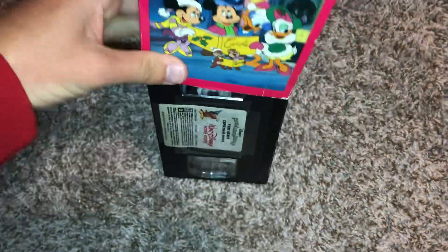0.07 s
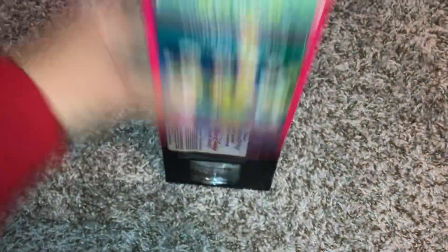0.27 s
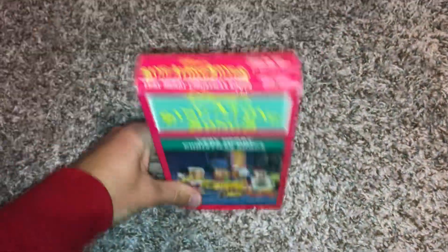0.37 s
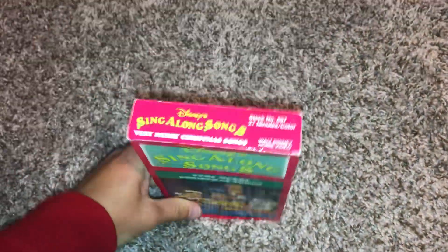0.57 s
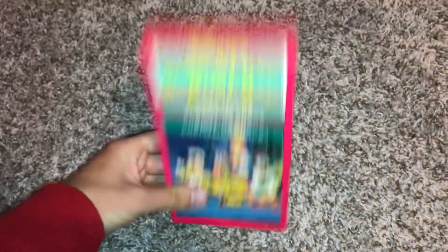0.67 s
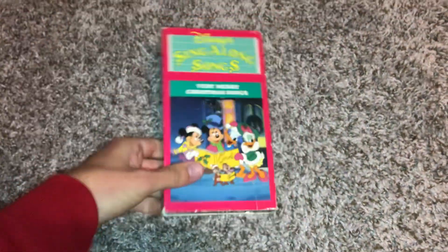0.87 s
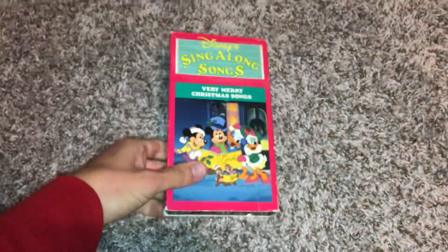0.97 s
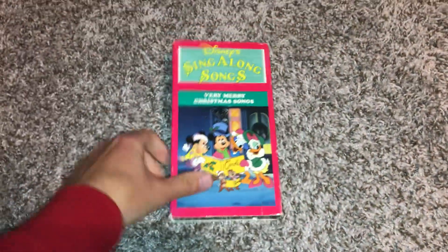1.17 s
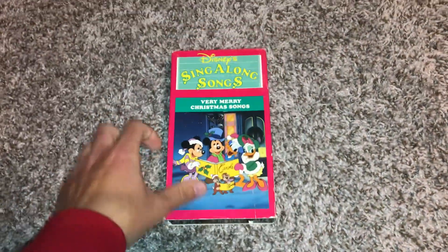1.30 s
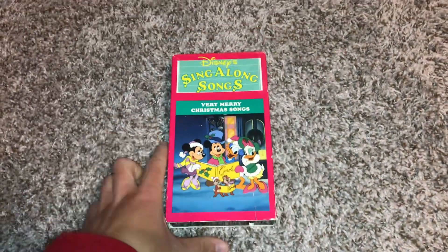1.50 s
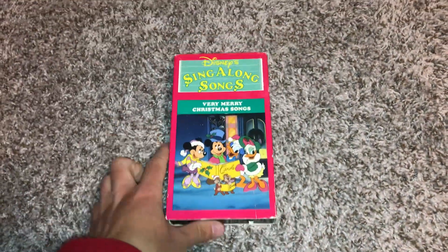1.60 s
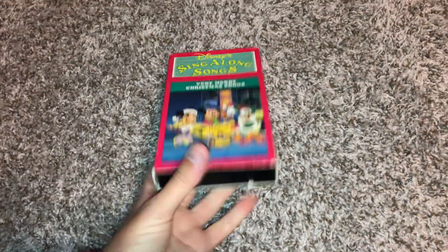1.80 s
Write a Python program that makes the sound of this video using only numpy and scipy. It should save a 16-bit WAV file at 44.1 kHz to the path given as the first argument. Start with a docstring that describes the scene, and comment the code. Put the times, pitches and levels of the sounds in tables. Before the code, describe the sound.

A cardboard sleeve scrapes onto a video cassette, clacks home, then knocks down onto carpet.

```python
"""In a small room with a steady mains hum, a cardboard sleeve is pushed down over a video cassette.
Its edges tick on the plastic, it scrapes, and it sticks and slips in a short rising squeak before the
cassette seats with a clack. The box is tipped over and laid on carpet with its loose reels rattling.
Fingers brush it and pick it up again. Each knock is a burst of noise plus a few ringing tones, each
scrape is a stream of tiny slips, and the room answers with a short echo."""
import sys
import numpy as np
from scipy import signal
from scipy.fft import rfft, irfft, next_fast_len
from scipy.io import wavfile

SR = 44100
rng = np.random.default_rng(int(sys.argv[2]) if len(sys.argv) > 2 else 0)


def store_pcm(level_fs):
    """Save levels as 16-bit WAV."""
    pcm = np.round(np.clip(level_fs, -1, 1) * 32767).astype(np.int16)
    wavfile.write(sys.argv[1], SR, np.atleast_2d(pcm).T)


N = 81585

# Four kinds of hit. Each row: start in seconds, level in dB, then bass and treble in dB from that level.
EDGE_CATCHES = [(.0298, -48.5, -27, -5), (.0432, -41.5, -17.5, -13), (.0713, -47, -4, -21.5),
                (.0755, -39.5, -4, -24.5), (.0995, -42, -9.5, -20), (.1178, -35, -7.5, -13.5),
                (.1220, -43.5, 6, -14.5), (.1865, -37, -7, -10), (.1885, -30, -4, -26.5),
                (.2130, -37, 2, -25), (.2210, -37.5, -4, 1.5), (.2935, -37.5, -16.5, -18)]  # cardboard edges catch on the plastic
SEATING_CLACKS = [(.3092, -19, -5.5, -0.5), (.3145, -25.5, -8.5, -6), (.3178, -17.5, -7.5, -5.5),
                  (.3228, -17, -12, -9.5)]  # the cassette seats in the sleeve
FINGER_TICKS = [(.5195, -47.5, -22, -15), (.5360, -53.5, 1, -0.5), (.6535, -52.5, -4, -2.5),
                (1.167, -51, -0.5, -11), (1.2017, -52.5, 2, -8), (1.2166, -43, -5, -9),
                (1.230, -50.5, 4, -15), (1.2415, -43, -4.5, -8.5), (1.8393, -45.5, 1, -6),
                (1.8475, -40.5, 6, -6.5)]  # fingers and nails tap the box
TIPPING_KNOCKS = [(.7252, -30.5, -7.5, -25), (.7285, -27, -45, -17.5), (.7320, -41.5, -33, -14),
                  (.7932, -30.5, -1.5, -0.5), (.7963, -35.5, -4, -1), (.8040, -45.5, 7.5, -1),
                  (.8205, -35.5, -10.5, -5), (.8305, -42, 4.5, -10.5), (.8835, -45, -5, -20)]  # shell and reels knock as the box tips and lands
# The tones a part rings with when hit. Each row: pitch in Hz, relative level in dB.
SLEEVE_TONES = [(700, -2.5), (930, -4.5), (1055, -2), (1560, -5.5)]
SHELL_TONES = [(562, -1.5), (675, -9), (1085, 6), (1687, 6), (1846, -6.5), (2213, -3), (2463, -1),
               (2966, -1.5), (3177, 3.5), (6875, -3.5)]
REEL_TONES = [(790, 3.5), (1290, -1), (1762, 4), (2467, 3), (2671, 1), (3850, 4)]
# The sharp tip of a hit. Each gives: pitch in Hz, seconds to fade by 60 dB, relative level in dB.
BARE_CLICK = (8800, 0.0011, 15)
REEL_PING = (8170, .016, 1)
# Hollow booms as the cassette seats and the box lands.
# Each row: start in seconds, pitch in Hz, level in dB, seconds to fade by 60 dB.
BOX_BOOMS = [(0.3216, 314.6, -14, 0.068), (0.796, 75.6, -32.5, 0.1), (0.817, 52.6, -24, 0.067)]

# How the longer noises swell and fade. Each row: time in seconds, level in dB.
RUMBLE_LEVELS = [(0, -58), (.17, -48), (.22, -41.5), (.28, -34.5), (.34, -42.5), (.39, -52.5), (.6, -74)]  # the box moves in the hand
SCRAPE_LEVELS = [(.195, -84), (.212, -53), (.226, -34.5), (.245, -35), (.272, -31), (.29, -30),
                 (.308, -31.5), (.328, -29.5), (.345, -65)]  # the sleeve is pushed on
BRUSH_LEVELS = [(.56, -69.5), (.587, -50), (.602, -53.5), (.632, -46.5), (.655, -47), (.70, -102),
                (1.12, -80), (1.163, -53.5), (1.183, -58.5), (1.212, -51.5), (1.258, -63), (1.278, -56),
                (1.31, -100.5)]  # skin and carpet brush the box
GRIP_LEVELS = [(1.48, -85.5), (1.66, -68.5), (1.84, -73.5)]  # fingertips slide round the box to grip it
# The path of the sleeve's squeak. Each row: time in seconds, pitch in Hz, level in dB.
SQUEAK_PATH = [(.243, 740, -34.5), (.249, 820, -27), (.258, 962, -25), (.266, 996, -22), (.273, 1050, -24),
               (.281, 1150, -25.5), (.286, 1180, -29), (.294, 1210, -31.5), (.301, 1233, -59.5)]
# The tones within the squeak. Each row: multiple of the pitch, relative level in dB.
SQUEAK_HARMONICS = [(1, 4), (2, -17), (3, -18)]

# A colour says how strong the lows and highs are. Each row: frequency in Hz, relative level in dB.
AIR_COLOUR = [(45, -19), (90, -19), (200, -21), (600, -26), (1300, -33), (1750, -30), (2150, -35),
              (4600, -38), (8000, -53), (15500, -54.5), (17000, -78.5)]  # moving air in the room
RUMBLE_COLOUR = [(45, -2), (90, 4), (180, -4), (350, -4.5), (1500, -53.5)]  # the handled box
THUMP_COLOUR = [(60, -17.5), (190, -4), (320, -1.5), (570, -1.5), (850, -12.5), (2000, -39)]  # the dull part of a hit
CARDBOARD_COLOUR = [(300, -40), (900, 5.5), (1700, -4), (2700, -10), (4500, -14.5), (16000, -50.5)]  # the crack of cardboard
PLASTIC_COLOUR = [(380, -31.5), (760, 2.5), (1800, 0), (3600, 3), (5000, -6), (8000, -15), (16000, -45)]  # the crack of plastic
BRIGHT_COLOUR = [(2000, -31.5), (4500, -10), (6400, 2.5), (8000, -10), (11000, -7.5), (16000, -17.5)]  # the snap of a hit, and sliding fingertips
SCRAPE_COLOUR = [(60, -21), (200, -3), (500, 4.5), (1200, 6), (2300, 2), (4000, -1.5), (6500, -4),
                 (10000, -6.5), (16000, -14)]  # cardboard sliding on plastic
BRUSH_COLOUR = [(100, 12), (280, 15), (900, 4), (3000, 6.5), (6000, -0.5), (9000, -5), (16000, -12.5)]  # skin and carpet on cardboard
ECHO_COLOUR = [(300, -4), (550, 5.5), (900, 1.5), (1500, 0.5), (16000, -1)]  # the room's answer

# The faint whine of an appliance. Each row: pitch in Hz, level in dB.
APPLIANCE_TONES = [(1520, -72), (1865, -69), (3192, -73.5), (4500, -75.5)]
# How long the room's echo lasts. Each row: frequency in Hz, seconds to fade by 60 dB.
ECHO_FADES = [(250, 0.29), (700, 0.32), (3000, 0.32), (14000, 0.27)]

HUM_HZ, HUM_DB, AIR_DB = 120, -45, -55.5
LOW_CUT_HZ, TOP_HZ = 30, 16600


def amp(db):
    """Turn decibels into a number to multiply by."""
    return 10 ** (np.asarray(db) / 20)


def unit(x):
    """Scale a sound so that its average power is 1."""
    return x / np.sqrt(np.mean(x ** 2) + 1e-20)


def along(points, hz):
    """Read a table between its frequencies, giving each octave about equal space."""
    freqs, values = np.transpose(points)
    return np.interp(np.log(hz + 1), np.log(freqs + 1), values)


def curves(rows):
    """Join timed rows with straight lines: one curve for each column after the time."""
    times, *columns = np.transpose(rows)
    return [np.interp(np.arange(N) / SR, times, column) for column in columns]


def gate(rows):
    """On between a table's first and last time, off outside them."""
    t = np.arange(N) / SR
    return (t >= rows[0][0]) & (t <= rows[-1][0])


def wobble(rate):
    """A curve that glides to a new random value rate times a second."""
    return np.interp(np.arange(N) * rate / SR, np.arange(N), rng.standard_normal(N))


def coloured(x, colour):
    """Shape a sound's lows and highs, then set its average power to 1."""
    gains = amp(along(colour, np.fft.rfftfreq(len(x), 1 / SR)))
    return unit(irfft(rfft(x) * gains, len(x)))


def fade(t, t60):
    """Die away by 60 dB every t60 seconds."""
    return np.exp(-np.log(1000) * t / t60)


def add(track, start, sound):
    """Mix a sound into the track at a start time in seconds."""
    part = track[int(start * SR):][:len(sound)]
    part += sound[:len(part)]


def background():
    """The mains hums, an appliance whines with a fuzzy pitch, and air moves."""
    t = np.arange(N) / SR
    hum = unit(np.sin(2 * np.pi * HUM_HZ * t)) * amp(HUM_DB + 0.33 * wobble(6))
    whine = sum(unit(np.sin(2 * np.pi * hz * t + 2 * wobble(80))) * amp(db)
                for hz, db in APPLIANCE_TONES)
    air = amp(AIR_DB) * coloured(rng.standard_normal(N), AIR_COLOUR)
    return hum + whine + air


def rumble_and_booms():
    """The hollow box rumbles in the hand and booms at the heavy hits."""
    rumble = coloured(rng.standard_normal(N), RUMBLE_COLOUR)
    out = rumble * amp(curves(RUMBLE_LEVELS)[0]) * gate(RUMBLE_LEVELS)
    t = np.arange(SR // 2) / SR
    for start, hz, db, t60 in BOX_BOOMS:
        rise = 1 - np.exp(-t * hz * 2)
        add(out, start, -amp(db) * np.sin(2 * np.pi * hz * t) * fade(t, t60) * rise)
    return out


def hits(rows, colour, tones, tip, crack_t60, ring_t60, ring_db, snap_ratio):
    """Each hit makes a dull thump, a crack and a bright snap with a sharp tip, and sets a part ringing."""
    out, t = np.zeros(N), np.arange(8192) / SR

    def struck(sound, t60):
        """Give a sound a fast rise, a fade and the energy of 5 ms at power 1."""
        sound = sound * fade(t, t60) * (1 - np.exp(-t / .0004))
        return sound / np.sqrt(np.sum(sound ** 2) / (.005 * SR))

    def burst(noise_colour, t60):
        """A short puff of noise."""
        return struck(coloured(rng.standard_normal(len(t)), noise_colour), t60)

    tip_hz, tip_t60, tip_db = tip
    click = amp(tip_db) * np.sin(2 * np.pi * tip_hz * t) * fade(t, tip_t60)
    for start, db, bass_db, treble_db in rows:
        ring = sum(amp(level + 2 * rng.normal()) * np.sin(2 * np.pi * (hz * t + rng.random()))
                   for hz, level in tones)
        thump = amp(bass_db) * burst(THUMP_COLOUR, crack_t60 * 1.7)  # the bass lasts longer
        snap = amp(treble_db) * (click + burst(BRIGHT_COLOUR, crack_t60 * snap_ratio))
        crack = burst(colour, crack_t60)
        add(out, start, amp(db) * (thump + crack + snap + amp(ring_db) * struck(ring, ring_t60)))
    return out


def rubbing(levels, colour, slips_per_s, hiss, uneven_db):
    """Fibres catch and let go in many tiny slips, over a smooth hiss."""
    slips = unit((rng.random(N) < slips_per_s / SR) * rng.standard_normal(N))
    grain = coloured(slips + hiss * rng.standard_normal(N), colour)
    return grain * amp(curves(levels)[0] + uneven_db * wobble(270)) * gate(levels)


def squeak():
    """Cardboard sticks and slips on plastic, faster as the push speeds up, so the pitch rises."""
    hz, db = curves(SQUEAK_PATH)
    shaky_hz = hz * (1 + .022 * wobble(600))
    phase = 2 * np.pi * np.cumsum(shaky_hz) / SR
    tone = unit(sum(amp(level) * np.sin(multiple * phase) for multiple, level in SQUEAK_HARMONICS))
    return tone * amp(db + 1.2 * wobble(400)) * gate(SQUEAK_PATH)


def room_echo(sound):
    """The near walls send back a few quick echoes, along with a soft tail that dies away."""
    hz, t, noise = signal.stft(rng.standard_normal(SR // 2), SR, nperseg=256)
    decay = amp(-60 * t / along(ECHO_FADES, hz)[:, None])
    tail = signal.istft(noise * decay, SR, nperseg=256)[1]
    tail *= 1 - np.exp(-np.arange(len(tail)) / SR / 0.0051)  # the tail takes a moment to build
    delays = (rng.uniform(0.0081, 0.024, size=14) * SR).astype(int)
    walls = np.bincount(delays, rng.standard_normal(size=14), len(tail))
    echo = amp(-17.5) * tail / np.linalg.norm(tail) + amp(-18.5) * walls / np.linalg.norm(walls)
    gains = amp(along(ECHO_COLOUR, np.fft.rfftfreq(SR, 1 / SR)))
    echo = irfft(rfft(echo, SR) * gains, SR)[:SR // 2]
    return signal.fftconvolve(sound, echo)[:N]


def scene():
    """All the sounds of the box, with their echo and the room's background."""
    box = rumble_and_booms()
    box += hits(EDGE_CATCHES, CARDBOARD_COLOUR, SLEEVE_TONES, BARE_CLICK,
                crack_t60=.035, ring_t60=.072, ring_db=.5, snap_ratio=.34)
    box += rubbing(SCRAPE_LEVELS, SCRAPE_COLOUR, slips_per_s=4700, hiss=.36, uneven_db=1.4)
    box += squeak()
    box += hits(SEATING_CLACKS, PLASTIC_COLOUR, SHELL_TONES, BARE_CLICK,
                crack_t60=.026, ring_t60=.05, ring_db=-3, snap_ratio=.54)
    box += hits(FINGER_TICKS, PLASTIC_COLOUR, REEL_TONES, BARE_CLICK,
                crack_t60=.037, ring_t60=.05, ring_db=-8.5, snap_ratio=.36)
    box += rubbing(BRUSH_LEVELS, BRUSH_COLOUR, slips_per_s=7000, hiss=.26, uneven_db=.8)
    box += hits(TIPPING_KNOCKS, PLASTIC_COLOUR, REEL_TONES, REEL_PING,
                crack_t60=.032, ring_t60=.021, ring_db=-2.5, snap_ratio=.6)
    box += rubbing(GRIP_LEVELS, BRIGHT_COLOUR, slips_per_s=1400, hiss=1, uneven_db=3)
    return (box + room_echo(box) + background())[None]


def record(dry):
    """The recorder drops the deepest bass and the very highest treble."""
    padded = next_fast_len(N + SR // 2)
    low_cut = signal.butter(4, LOW_CUT_HZ, "highpass", fs=SR, output="sos")
    sound = signal.sosfilt(low_cut, dry)
    kept = np.fft.rfftfreq(padded, 1 / SR) < TOP_HZ
    return irfft(rfft(sound, padded) * kept, padded)[:, :N]


dry = scene()
out = record(dry)
store_pcm(out)
```